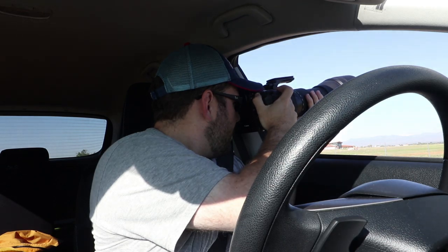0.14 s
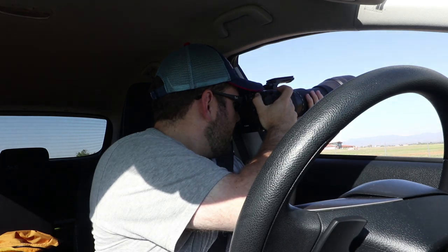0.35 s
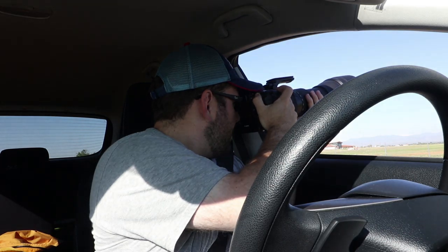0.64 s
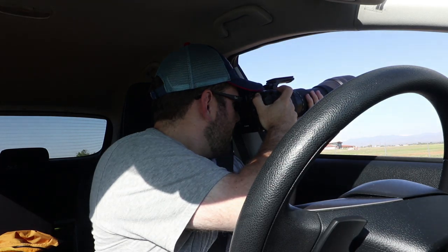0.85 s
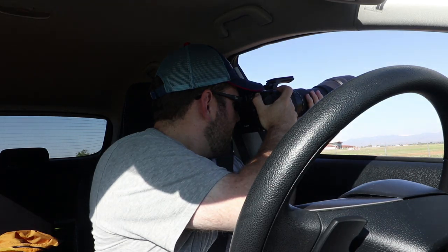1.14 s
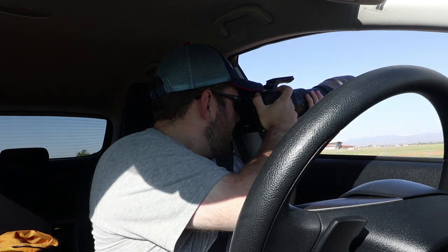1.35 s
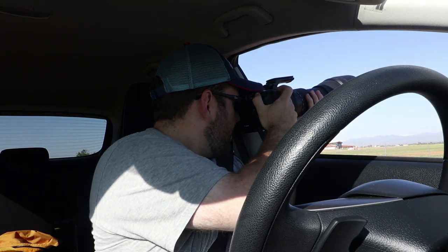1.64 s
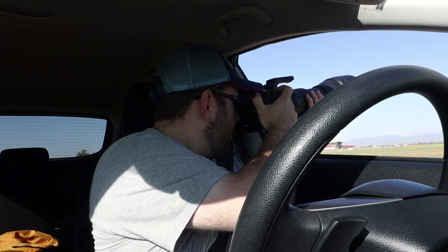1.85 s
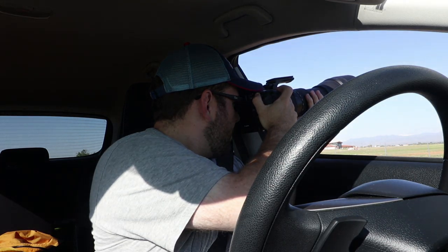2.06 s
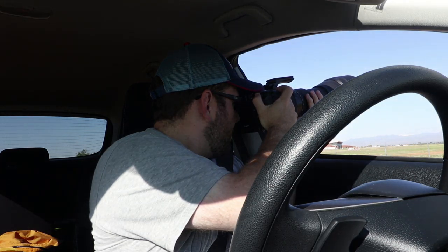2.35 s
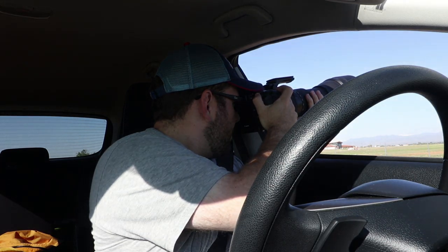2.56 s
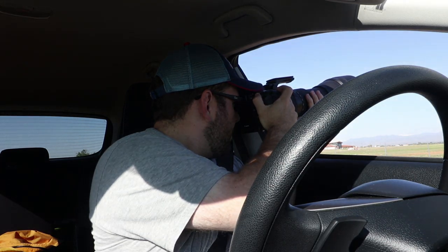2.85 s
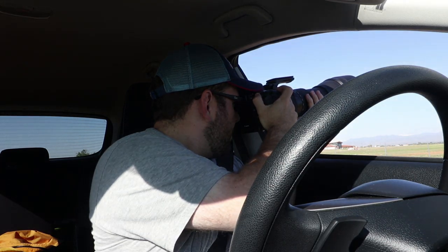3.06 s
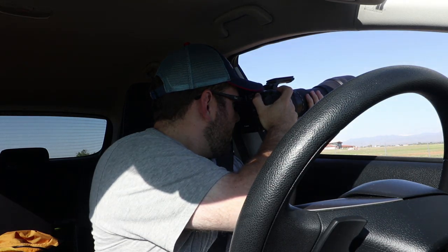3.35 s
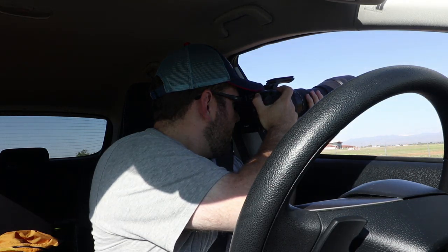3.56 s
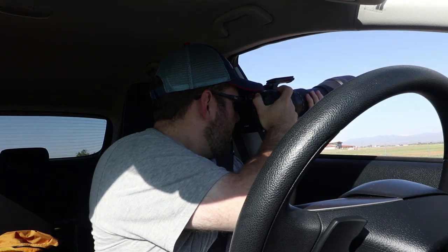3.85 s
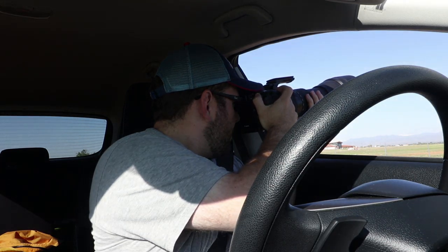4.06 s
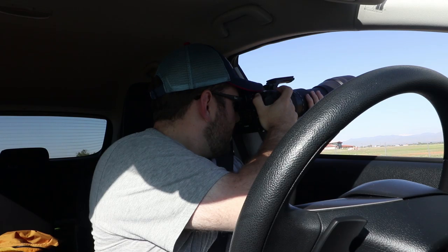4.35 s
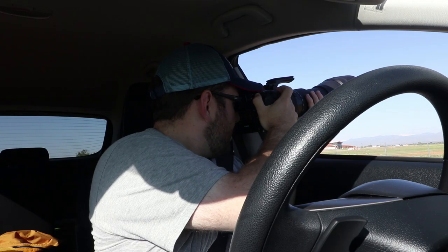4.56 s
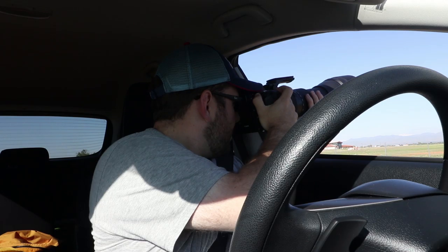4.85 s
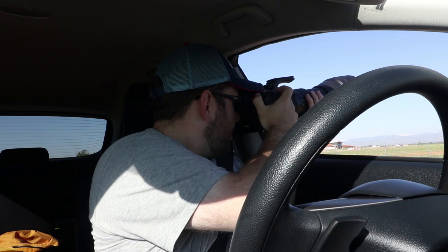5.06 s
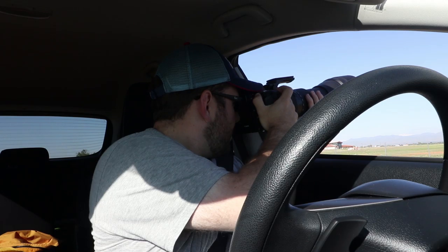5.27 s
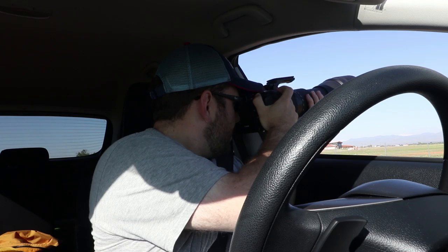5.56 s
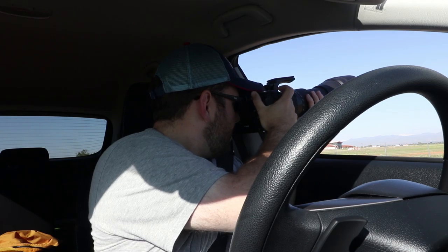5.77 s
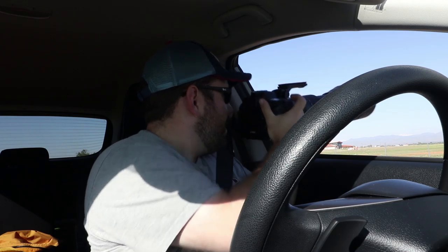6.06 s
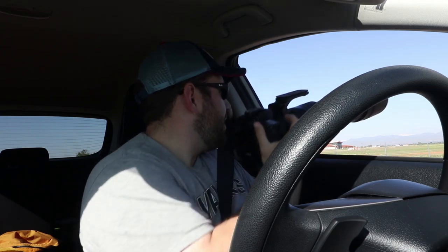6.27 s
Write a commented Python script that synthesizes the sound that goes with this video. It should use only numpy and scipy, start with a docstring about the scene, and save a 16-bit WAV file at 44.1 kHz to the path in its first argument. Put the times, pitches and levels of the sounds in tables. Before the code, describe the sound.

Four quick runs of sharp mirror-and-shutter clatter sound close by in a dry car cabin, over a soft, steady engine hum and faint air.

```python
"""An idling engine booms under faint whines and a wash of air, inside a parked car.
A reflex camera in the cabin then fires four bursts at ten frames a second, each part a chain of noise blows:
the mirror slaps up, the shutter runs, and the mirror drops back and latches, with decaying sines ringing on.
Short padded reflections follow; at the end the camera is lowered with ticks, a rustle, rubs and a knock.
The camera reaches the microphone direct and by those reflections; the recorder cuts the extreme treble."""
import sys
import numpy as np
from scipy import signal
from scipy.fft import rfft, irfft
from scipy.io import wavfile

SR = 44100
rng = np.random.default_rng(int(sys.argv[2]) if len(sys.argv) > 2 else 0)


def inscribe(sig):
    """Save sig as 16-bit PCM at rate SR to the path in sys.argv[1].

    A 1-D sig is mono; a 2-D sig holds one channel per row.
    Samples are clipped to [-1, 1] before scaling.
    """
    pcm = np.round(np.clip(np.atleast_2d(sig).T, -1, 1) * 32767)
    wavfile.write(sys.argv[1], SR, pcm.astype(np.int16))


N = 283563


def gain_of(db):
    """Decibels to amplitude."""
    return 10 ** (np.asarray(db) / 20)


def evened(x):
    """Scales to rms 1."""
    return x / np.sqrt(np.mean(x ** 2) + 1e-20)


def read(points, hz):
    """Reads a spectrum on a log-frequency axis."""
    f, value = np.transpose(points)
    return np.interp(np.log(hz + 1), np.log(f + 1), value)


def add(mix, start_s, sound):
    """Mixes a sound in at a start time, cut off at the end of the mix."""
    part = mix[max(round(start_s * SR), 0):][:len(sound)]
    part += sound[:len(part)]


def noise(colour):
    """Steady noise of a given spectrum, rms 1."""
    hz = np.fft.rfftfreq(N, 1 / SR)
    spectrum = rfft(rng.standard_normal(N)) * gain_of(read(colour, hz))
    return evened(irfft(spectrum, N))


def drift(rate_hz):
    """Slow random wandering, rms 1: noise kept below about rate_hz, without its mean."""
    hz = np.fft.rfftfreq(N, 1 / SR)
    spectrum = rfft(rng.standard_normal(N)) * np.exp(-(hz / rate_hz) ** 2) * (hz > 0)
    return evened(irfft(spectrum, N))


# lowest line of the idling engine, in turns per second
IDLE_HZ = 25.38
# engine lines: multiple of the lowest line, level/dB rms
IDLE_ORDERS = [(1, -63), (2, -58), (3, -64), (4, -66.5), (5, -83), (6, -73.5), (7, -66), (8, -73)]


def engine_boom(speed_wander=0.0032, throb_db=0.74):
    """Engine orders boom through the car body, sharing one wandering speed while each level throbs."""
    turns = np.cumsum(IDLE_HZ * (1 + speed_wander * drift(2.8))) / SR
    boom = np.zeros(N)
    for multiple, db in IDLE_ORDERS:
        level = gain_of(db + throb_db * drift(4.5))
        boom += level * np.sin(2 * np.pi * (round(multiple) * turns + rng.random()))
    return np.sqrt(2) * boom  # a sine of peak sqrt(2) has rms 1


# steady whines of fan and belt: f/Hz, level/dB rms
WHINES = [(404.2, -68), (672, -79), (874, -77), (1351, -83), (1651, -88)]


def fan_and_belt(whine_wander=.002, whine_flutter_db=2.0):
    """Faint sines whose pitches wander together and whose levels flutter apart."""
    spin = np.cumsum(1 + whine_wander * drift(6.3)) / SR
    whine = np.zeros(N)
    for hz, db in WHINES:
        level = gain_of(db + whine_flutter_db * drift(7.6))
        whine += level * np.sin(2 * np.pi * hz * spin)
    return np.sqrt(2) * whine


# overall level of the wash, dB rms
WASH_DB = -56.5
# spectrum of ventilation and engine wash in the cabin: f/Hz, relative density/dB
WASH = [(20, -7.5), (60, 5), (120, -0.5), (190, 3), (270, -0.5), (410, -0.5), (500, -6), (660, -7.5),
        (900, -11), (1080, -14), (1450, -12), (1820, -14), (2100, -26), (3500, -31), (8000, -33.5),
        (15500, -36.5)]


def air_wash():
    """Ventilation and engine wash: steady noise, darkest at the top."""
    return gain_of(WASH_DB) * noise(WASH)


def idle():
    """The parked car running: boom, whines and wash, at their cabin levels."""
    return engine_boom() + fan_and_belt() + air_wash()


# the drive repeats at a steady rate, ten frames a second
FRAME_S = 0.09995
# the mirror starts up this long before the shutter runs; earlier in the first frame, from rest
MIRROR_LEAD_S, FIRST_LEAD_S = 0.0375, 0.0452
# one row a press of the button: first shutter run t/s, frames
BURSTS = [(1.3193, 4), (1.9533, 3), (3.0770, 5), (4.9994, 7)]


def frame_times():
    """When the mirror rises and when the shutter runs, for every frame of every burst."""
    rise_s, shutter_s = [], []
    for start_s, count in BURSTS:
        for k in range(count):
            run_s = start_s + k * FRAME_S
            lead_s = MIRROR_LEAD_S if k else FIRST_LEAD_S
            rise_s.append(run_s - lead_s)
            shutter_s.append(run_s)
    return rise_s, shutter_s


# resonances of the camera, shared by all blows: f/Hz, width/Hz, lift/dB (negative is a dip)
BODY = [(564, 29, 1.5), (744, 210, 6.5), (1076, 58, 5), (1367, 75, 4), (1777, 110, 5.5), (2226, 110, 8),
        (2456, 47, 6), (2684, 120, 5), (2944, 196, 9), (3596, 430, 6.5), (4140, 27, 4.5), (4480, 230, 7),
        (5030, 420, 3), (5450, 160, 5.5), (5810, 120, 4.5), (6590, 350, 8), (8060, 690, 4), (9100, 100, -3),
        (12800, 570, 4)]


def camera_response(colour, tilt_db=0, size=4096):
    """Causal (minimum-phase) response of the camera to a blow of a given colour, energy 1."""
    hz = abs(np.fft.fftfreq(size, 1 / SR))
    db = read(colour, hz) + tilt_db * np.log2(np.maximum(hz, 500))  # tilts per octave above 500 Hz
    for f, width, lift in BODY:
        db = db + lift / (1 + (2 * (hz - f) / width) ** 2)
    log_spectrum = np.conj(signal.hilbert(np.log(gain_of(db))))
    response = np.fft.ifft(np.exp(log_spectrum)).real[:size // 2]
    return response / np.linalg.norm(response)


def chatter(t, decay_ms, rise_ms=.6):
    """One impact: a dense rattle of tiny contacts that builds and dies within milliseconds."""
    ms = 1000 * t
    return rng.standard_normal(len(t)) * (1 - np.exp(-ms / rise_ms)) * np.exp(-ms / decay_ms)


# how closely a blow repeats from frame to frame; the low knock repeats best: f/Hz, share of power
ALIKE = [(600, .95), (1500, .8), (4500, .7), (12000, .5)]


def movement(times, blows, colour, scatter_db=.5, scatter_ms=.08, size=2048):
    """A chain of blows, repeated with the same rhythm and much the same rattle in every frame."""
    t, out = np.arange(size) / SR, np.zeros(N)
    alike = read(ALIKE, np.fft.rfftfreq(size, 1 / SR))
    for delay_ms, db, decay_ms in blows:
        habit = rfft(chatter(t, decay_ms))  # the part of the rattle that the mechanism repeats each time
        for start_s in times:
            late, hard = rng.standard_normal(2)
            fresh = rfft(chatter(t, decay_ms))
            blow = irfft(np.sqrt(alike) * habit + np.sqrt(1 - alike) * fresh)
            at_s = start_s + (delay_ms + scatter_ms * late) / 1000
            add(out, at_s, gain_of(db + scatter_db * hard) * blow)
    return signal.oaconvolve(out, camera_response(colour))[:N]


# blows of the rising mirror: delay from its start/ms, level/dB, decay time/ms
RISE_BLOWS = [(1.212, -47, 9.6), (4.994, -45.5, 4.8), (9.48, -46, 8.3), (14.83, -37, 3.64),
              (16.51, -39, 5.54), (20.49, -47, 3.9), (29.2, -55.5, 3.6)]
# their colour: f/Hz, relative level/dB
RISE_COLOUR = [(150, -35), (280, -11), (400, -16), (600, 1), (1000, -7), (1600, -0.5), (2400, -7),
               (3300, -9.5), (4600, -4), (6500, -13), (8700, -6.5), (12500, -14.5), (15500, -22.5)]


def mirror_rise(rise_s):
    """The mirror slaps up in a chain of blows."""
    return movement(rise_s, RISE_BLOWS, RISE_COLOUR)


# blows of the shutter: delay from the shutter run/ms, level/dB, decay time/ms
SHUTTER_BLOWS = [(0.2, -46.5, 7.1), (4.0, -42, 7.3), (10.3, -45, 4.4), (14.5, -49, 10.6)]
# their colour: f/Hz, relative level/dB
SHUTTER_COLOUR = [(150, -22), (400, -31), (600, -11), (1000, -5.5), (1600, 1.5), (2400, -6), (3300, -7.5),
                  (4600, 1.5), (6500, -5), (8700, -5.5), (12500, -11), (15500, -15)]


def shutter_run(shutter_s):
    """The shutter runs, a brighter chain of blows."""
    return movement(shutter_s, SHUTTER_BLOWS, SHUTTER_COLOUR)


# parts that ring on after a blow: delay from the shutter run/ms, f/Hz, level/dB, t60/s
RINGS = [(0.5, 900, -51, 0.077), (4.29, 5000, -52.5, 0.052), (4.23, 8037, -44, 0.034),
         (4.22, 735, -50, 0.088), (19.34, 570, -45.5, 0.054), (19.4, 668, -47, 0.049),
         (22.3, 8880, -48, 0.032), (35.99, 670, -48, 0.066), (45.7, 8040, -54.5, 0.021),
         (45.3, 7100, -56, 0.02), (48.27, 620, -52, 0.053)]


def ringing(shutter_s, scatter_db=1.0, detune=0.0027, scatter_ms=.08, size=8192):
    """Springs and the mirror box ring on as decaying sines, slightly different in every frame."""
    t, out = np.arange(size) / SR, np.zeros(N)
    for run_s in shutter_s:
        for delay_ms, hz, db, t60 in RINGS:
            hard, off, late = rng.standard_normal(3)
            level = gain_of(db + scatter_db * hard - 60 * t / t60)
            ring = level * np.sin(2 * np.pi * hz * (1 + detune * off) * t)
            add(out, run_s + (delay_ms + scatter_ms * late) / 1000, ring)
    return out


# blows of the falling mirror: delay from the shutter run/ms, level/dB, decay time/ms
FALL_BLOWS = [(19.75, -37.5, 3.4), (22.04, -36.5, 3.6), (25.4, -39.5, 4), (30, -44, 5.5)]
# their colour: f/Hz, relative level/dB
FALL_COLOUR = [(150, -41), (400, -19), (600, -5), (1000, -14), (1600, -4.5), (2400, -11), (3300, -12),
               (4600, -5), (6500, -11.5), (8700, -3.5), (12500, -10), (15500, -22.5)]


def mirror_fall(shutter_s):
    """The mirror drops back in a chain of blows."""
    return movement(shutter_s, FALL_BLOWS, FALL_COLOUR)


# blows of the latch: delay from the shutter run/ms, level/dB, decay time/ms
LATCH_BLOWS = [(44.8, -50, 2.8), (49, -48, 4)]
# their colour: f/Hz, relative level/dB
LATCH_COLOUR = [(200, -23), (600, 0), (1400, 7.5), (2500, -4), (4500, -8.5), (6500, -13), (8400, -10.5),
                (12500, -14), (15500, -20)]


def latch(shutter_s):
    """The latch closes each frame with duller, softer blows."""
    return movement(shutter_s, LATCH_BLOWS, LATCH_COLOUR)


def bursts():
    """Mirror up, shutter run, mirror down and latch, frame after frame."""
    rise_s, shutter_s = frame_times()
    before = mirror_rise(rise_s) + shutter_run(shutter_s)
    after = mirror_fall(shutter_s) + latch(shutter_s)
    return before + after + ringing(shutter_s)


def cabin(x, wet_db=-12, t60=0.1, gap_s=.004, size=6000):
    """Seats and roof lining soak up the reflections quickly: sparse random taps after a short gap."""
    t = np.arange(size) / SR
    sparse = rng.standard_normal(size) * (rng.random(size) < .1)
    taps = sparse * (t > gap_s) * gain_of(-60 * t / t60)
    reflections = signal.oaconvolve(x, taps / np.linalg.norm(taps))[:N]
    return x + gain_of(wet_db) * reflections


def tap(db, decay_ms, colour, tilt_db=0, size=2048):
    """One small impact sounding through the camera's resonances."""
    impact = chatter(np.arange(size) / SR, decay_ms)
    return gain_of(db) * signal.fftconvolve(impact, camera_response(colour, tilt_db))


# small ticks of the button and the grip: t/s, level/dB, decay time/ms, tilt above 500 Hz/dB per octave
TICKS = [(2.273, -56, 4, 1), (5.765, -68, 4, 0), (5.808, -58.5, 4, -1.5), (5.855, -59.5, 5, -1),
         (5.907, -68, 4, -6), (6.350, -63.5, 5, 1)]
# their colour before the tilt: f/Hz, relative level/dB
TICK_COLOUR = [(300, -20), (1200, -3), (2400, 0), (5000, -3), (9000, -1), (15500, -12)]


def ticks():
    """The button lets go, and later the grip ticks as the camera comes down."""
    out = np.zeros(N)
    for start_s, db, decay_ms, tilt_db in TICKS:
        add(out, start_s, tap(db, decay_ms, TICK_COLOUR, tilt_db))
    return out


# sleeve and strap sliding, each slide a swell and a fade: middle t/s, peak level/dB, length/s
SLIDES = [(5.858, -81, 0.68), (6.13, -72, 0.15), (6.4, -81, .3)]
# colour of the cloth: f/Hz, relative level/dB
RUSTLE_COLOUR = [(500, -15), (2800, -13), (5000, -7), (8000, -10), (11500, -10), (15500, -8)]


def rustle():
    """Cloth slides as the camera comes down: coloured noise under smooth swells."""
    sliding = np.zeros(N)
    for middle_s, db, length_s in SLIDES:
        swell = gain_of(db) * np.hanning(int(length_s * SR))
        add(sliding, middle_s - length_s / 2, swell)
    return sliding * noise(RUSTLE_COLOUR)


# the rubber grip rubbing under the hand: start t/s, f/Hz, level/dB rms over the rub, length/s
RUBS = [(5.68, 2850, -81, .1), (5.885, 2650, -77, .04), (5.96, 2500, -75, .025), (5.985, 2900, -82, .04),
        (6.39, 2950, -81, .035)]


def rubbing(width_hz=130):
    """Friction noise in one narrow resonance, swelling and fading with each rub."""
    out, r = np.zeros(N), np.exp(-np.pi * width_hz / SR)
    for start_s, hz, db, length_s in RUBS:
        friction = rng.standard_normal(SR // 4)
        poles = [1, -2 * r * np.cos(2 * np.pi * hz / SR), r * r]
        rub = signal.lfilter([1, 0, -1], poles, friction)[:int(length_s * SR)]
        add(out, start_s, gain_of(db) * evened(rub * np.hanning(len(rub))))
    return out


# the camera body knocks once as it leaves the face: t/s, level/dB, decay time/ms
KNOCK = (5.958, -50, 3)
# its colour: f/Hz, relative level/dB
KNOCK_COLOUR = [(300, -22), (900, -3), (1600, 0), (2500, -10), (3500, -23), (9000, -28), (15500, -40)]


def body_knock():
    """One low, dull impact on the camera body."""
    out = np.zeros(N)
    start_s, db, decay_ms = KNOCK
    add(out, start_s, tap(db, decay_ms, KNOCK_COLOUR))
    return out


def scene():
    """The camera in the cabin, over the idling car."""
    handling = ticks() + rustle() + rubbing() + body_knock()
    return (idle() + cabin(bursts() + handling))[None]


# upper edge of the recorder's band
EDGE_HZ = 15850


def record(dry):
    """The recorder's band limit: a steep linear-phase low-pass."""
    low_pass = signal.firwin(511, EDGE_HZ, window=("kaiser", 9), fs=SR)
    return signal.oaconvolve(dry, low_pass[None], "same")


dry = scene()
out = record(dry)
inscribe(out)
```